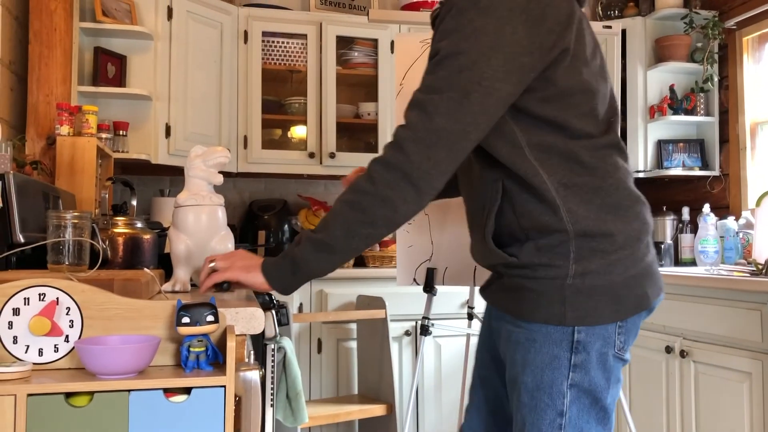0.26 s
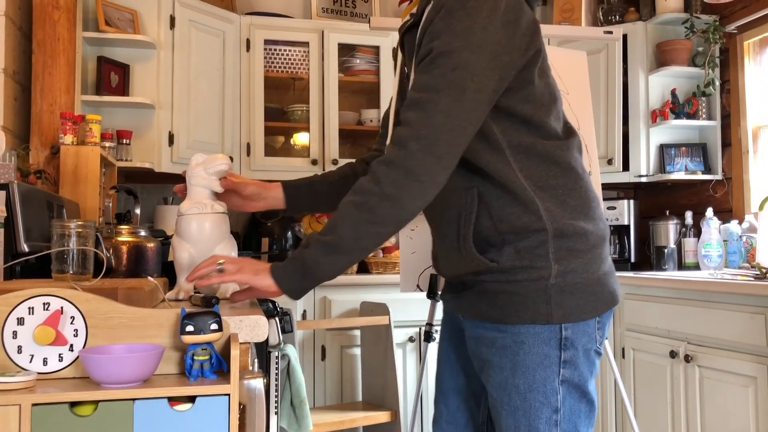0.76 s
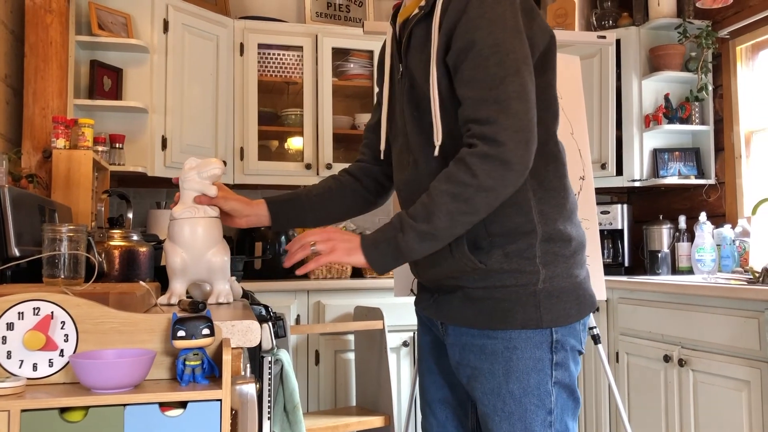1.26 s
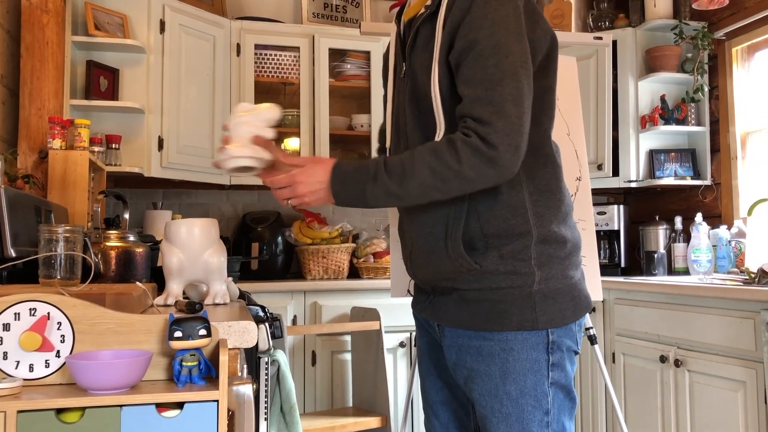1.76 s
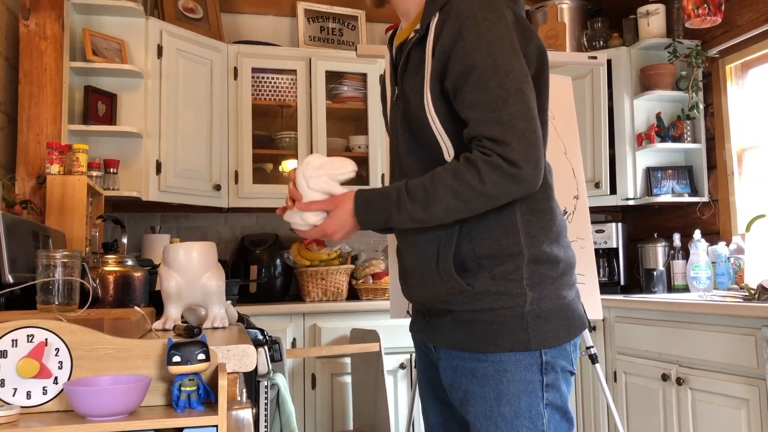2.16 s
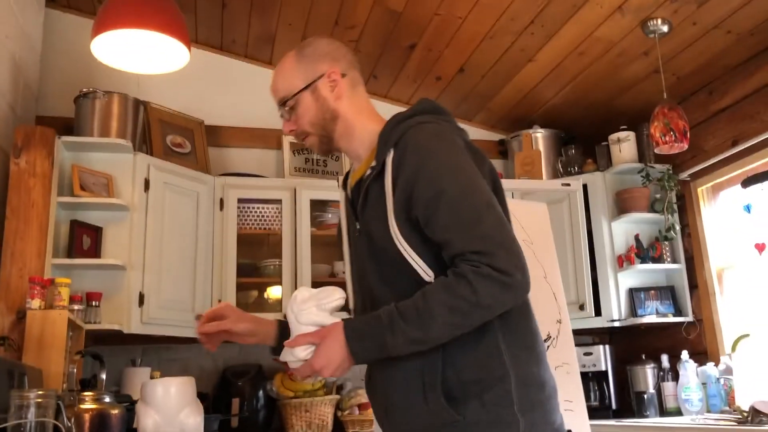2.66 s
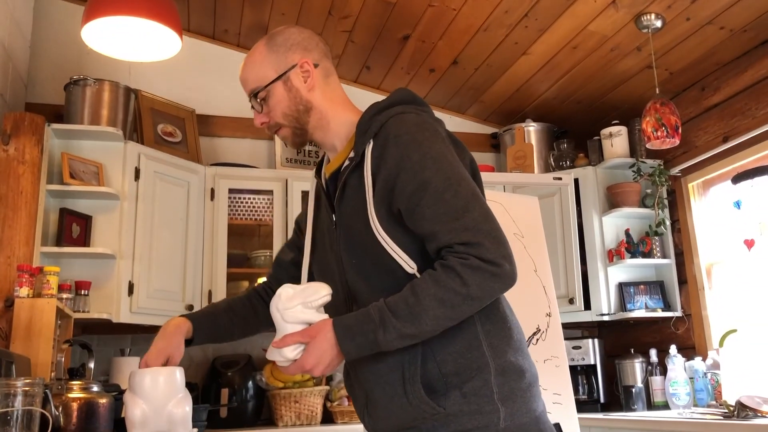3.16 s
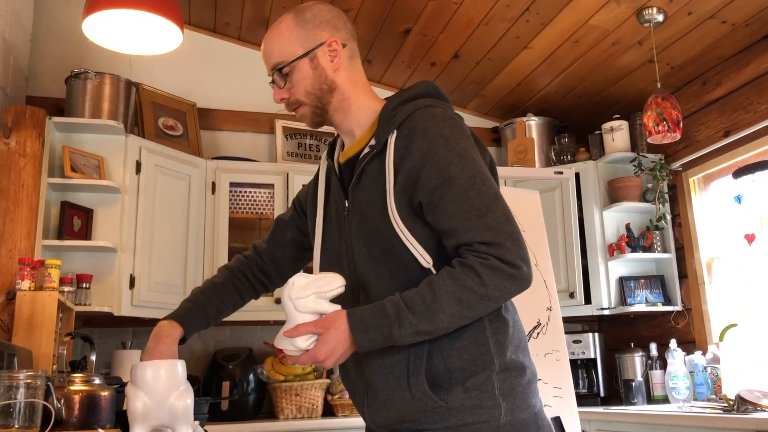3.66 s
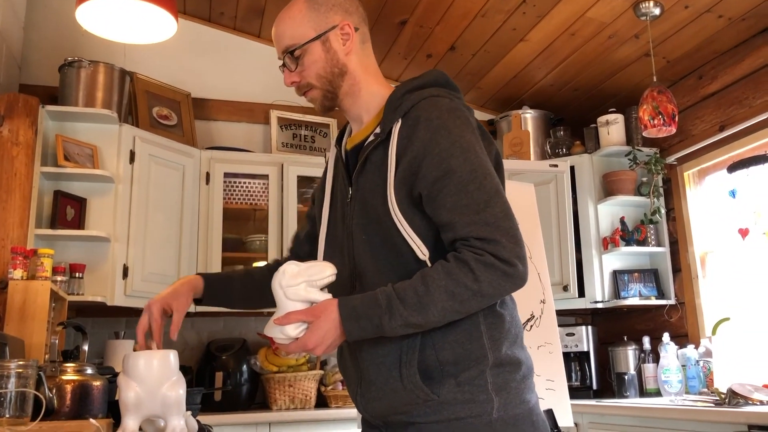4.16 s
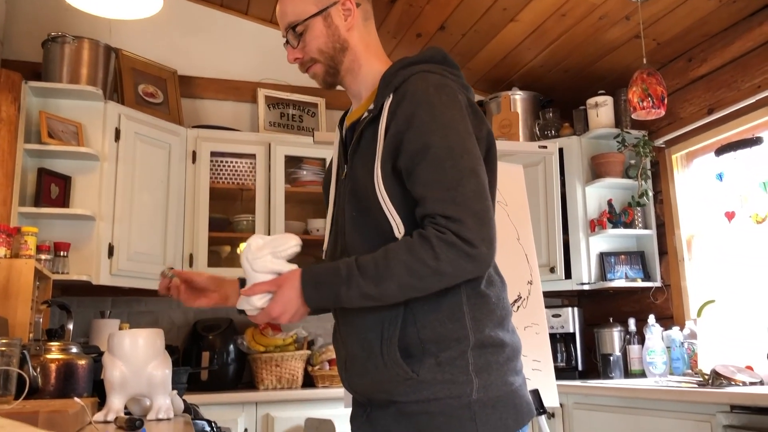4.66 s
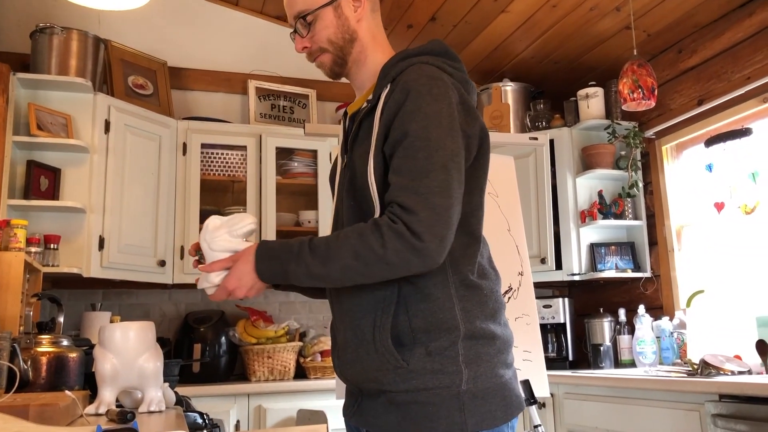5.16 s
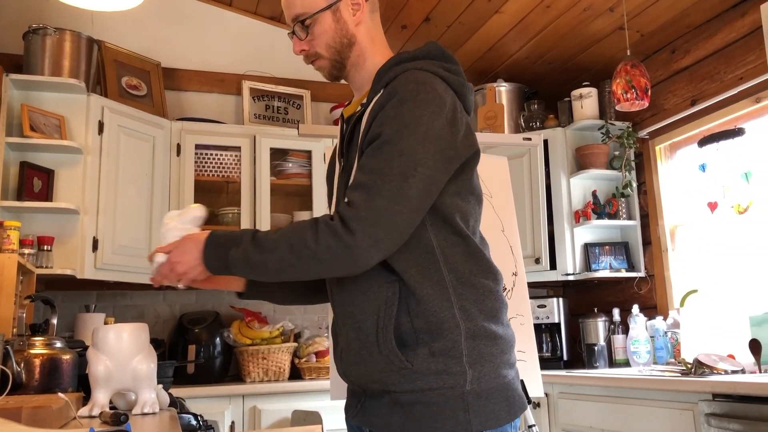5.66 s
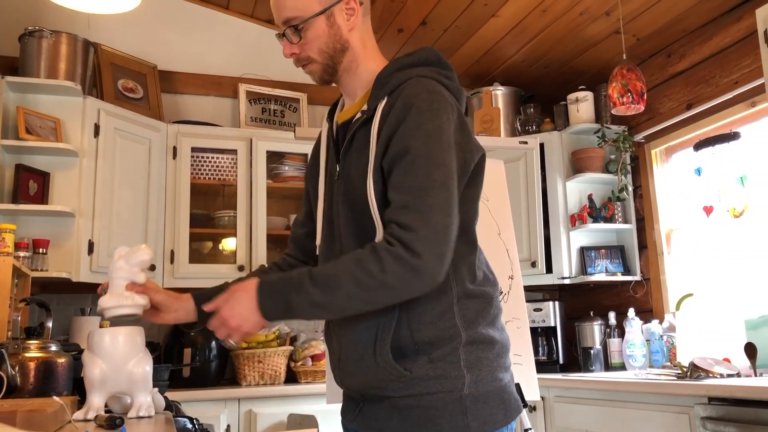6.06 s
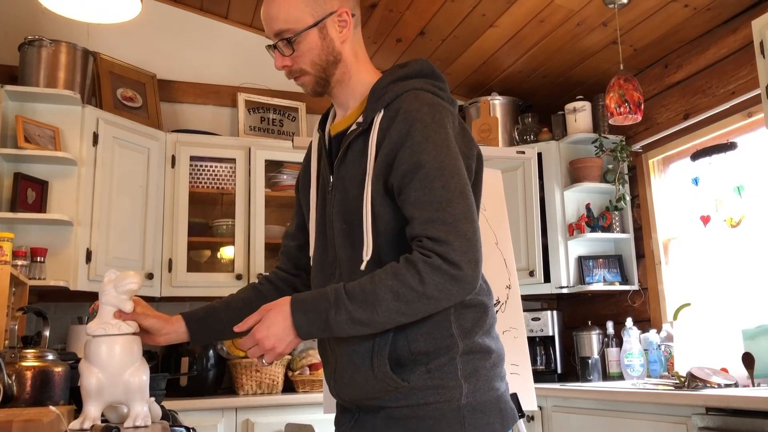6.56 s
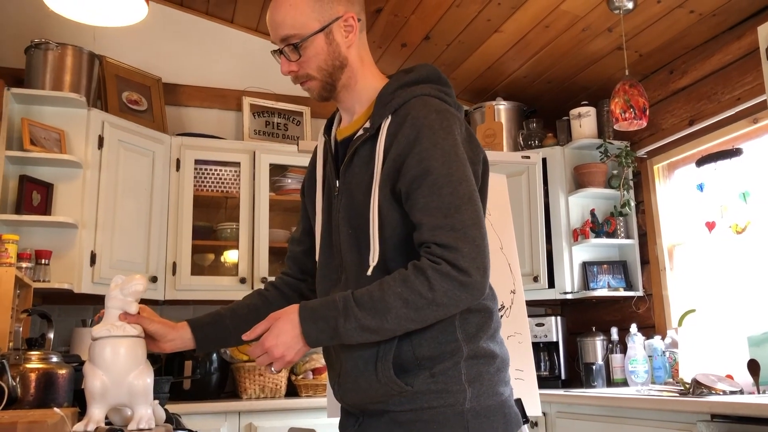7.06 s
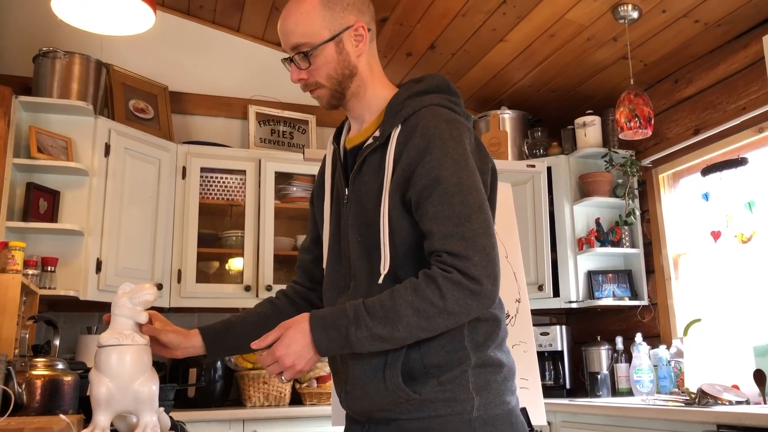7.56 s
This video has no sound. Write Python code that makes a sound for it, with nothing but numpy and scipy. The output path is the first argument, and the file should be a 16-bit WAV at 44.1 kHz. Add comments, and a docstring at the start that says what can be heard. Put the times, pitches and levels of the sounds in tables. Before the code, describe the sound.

A ceramic jar lid clinks softly as it lifts off, pings once when tapped, then is set back with bright ringing clinks in a quiet kitchen.

```python
"""The ceramic lid of a hollow jar clinks, bounces and scrapes on its rim: decaying modes ring the pottery,
damped bursts give the crack of the glaze and the knock of the wall, and low modes thud in the counter below.
Softer bumps rock the jar. Off the jar, the lid whispers under sliding fingers and pings once when tapped.
Hands pat the counter, click and squeak; a sleeve rustles as shaped noise. Echoes and a diffuse tail place this
in a quiet kitchen, over an appliance made of fan noise and faint wavering tones."""
import sys
import numpy as np
from scipy import signal
from scipy.fft import rfft, irfft
from scipy.io import wavfile

SR = 44100
rng = np.random.default_rng(int(sys.argv[2]) if len(sys.argv) > 2 else 0)


def to_wav(sig):
    """Store sig (one row per channel, or 1-D mono) as 16-bit WAV at the path in sys.argv[1].

    Samples outside -1..1 are clipped; the rate is SR.
    """
    pcm = np.clip(np.atleast_2d(sig), -1, 1) * 32767
    pcm = np.round(pcm).astype(np.int16)
    wavfile.write(sys.argv[1], SR, pcm.T)  # frames by channels


N = 344063

# Appliance air colour. Each row: frequency in Hz, relative level in dB.
AIR_COLOUR = [(12, -59), (20, -42), (49, -7), (68, 0), (86, -4), (177, 0), (270, -1), (293, -4.5),
              (377, -4), (459, -7.5), (624, -15), (2990, -27.5), (5080, -28), (7110, -33.5), (16000, -37.5)]
# Appliance hum. Each row: frequency in Hz, rms level in dB before the overall hum trim.
HUM_LINES = [(59.2, -72), (296.1, -68), (468.3, -71.5), (506.0, -74), (549.1, -75), (10008, -92.5),
             (11897, -101)]
# Cloth colour of the sleeve. Each row: frequency in Hz, relative level in dB.
SLEEVE_COLOUR = [(350, -28.5), (600, -5.5), (625, 3.5), (679, -1), (3120, -4), (3530, -4.5), (15100, -15),
                 (16000, -19.5)]
# The arm moves as the hand grips the lid. Each row: start in seconds, length in seconds, peak level in dB.
ARM_MOVES = [(.55, .8, -73)]
# The hand pats the counter. Each row: start in seconds, slap level in dB, slap centre in Hz, thud level in dB.
COUNTER_PATS = [(0.2278, -48.5, 1760, -50.5), (0.334, -86, 910, -50), (.449, -49, 1460, -51)]
# Modes of the jar and the counter under it. Each row: frequency in Hz, level in dB before the thud's
# centre is favoured, 60 dB decay time in seconds.
COUNTER_MODES = [(66.5, -15.5, 0.2), (90, -12, 0.25), (113, -19.5, 0.39), (187.5, -3.5, 0.14),
                 (223, -3.5, 0.06), (289, 1, 0.049), (336.4, -6, 0.067), (413.5, -18, 0.33),
                 (626, 2.5, 0.049), (858, -16.5, 0.27), (931, -2.5, 0.1), (970, -31, 0.054)]
# Dull bumps that rock the jar, from the hand or from the lid settling.
# Each row: start in seconds, knock level in dB, thud level in dB, thud centre in Hz.
JAR_BUMPS = [ (.713, -47, -45, 1050), (.7325, -44.5, -43.5, 1010), (0.79, -46.5, -37.5, 148),
             (0.827, -45, -37, 215), (3.2445, -43, -38, 258), (3.264, -52, -38.5, 200),
             (3.2918, -50.5, -31, 215), (3.3954, -51, -38, 226), (7.025, -47, -33.5, 150)]
# Crack colour of the glaze. Each row: frequency in Hz, level in dB before tilting.
GLAZE_COLOUR = [(500, 6.5), (1500, -2), (3000, 4), (4800, -10), (6500, -0.5), (9000, -25), (12000, -22.5),
                (16000, -17)]
# Modes of the jar with its lid on the rim. One entry per mode: frequency in Hz.
JAR_MODES_HZ = [1610, 2185, 2637, 2730, 2955, 3063, 3380, 3580, 3930, 4025, 4100, 4322, 4440, 5022, 5600,
                5845, 6030, 6155, 6690, 7195, 7767, 8160, 8537, 8930, 9450, 10200, 10800, 11720, 12460,
                13595]
# The same modes, one entry each: level in dB before touch and spot reshape them.
JAR_MODES_DB = [-2.5, -4, 4, 1.5, -10.5, -50.5, -21, -1, -1.5, -7, -1, -5.5, -6.5, -3, -4.5, -11.5, -9, -3,
                -17.5, -8, -5, -36.5, -13.5, -16, -13, -14, -14.5, -15.5, -16.5, -27.5]
# The lid strikes the rim. Each row: start in seconds, ring level in dB, knock level in dB, thud level in dB,
# tilt in dB per octave, pitch in Hz that this spot on the rim favours, boost at that pitch in dB.
LID_CLINKS = [ (0.7314, -49.5, -47, -39, -0.5, 4400, 10), (1.286, -52, -49, -44.5, -1, 2620, 12),
              (1.353, -33.5, -43.5, -33.5, .5, 5600, 6), (1.424, -49, -59, -64, -9, 2600, 26),
              (6.257, -32.5, -26.5, -24, 2, 4220, 18), (6.6276, -30.5, -52, -33, 1, 2640, 15),
              (6.635, -30, -52, -40, -1, 2600, 22), (6.846, -51.5, -44.5, -41.5, -1.5, 3500, 5),
              (6.9824, -27.5, -42, -40, 0.5, 2730, 6.5), (6.995, -17.5, -29, -38.5, 2, 3500, 9.5),
              (7.001, -27, -43.5, -34.5, 4.5, 3380, 10), (7.016, -22, -30, -36.5, 1.5, 2950, 24),
              (7.321, -31.5, -32, -29, 0, 4050, 16), (7.392, -53, -55, -48, 1, 5600, 17),
              (7.4667, -56, -41.5, -45.5, -21, 5000, 28)]
# The lid scrapes along the rim, swelling and fading.
# Each row: start in seconds, length in seconds, peak level in dB.
RIM_SCRAPES = [(1.30, 0.083, -49.5), (6.57, 0.022, -57.5), (6.655, 0.06, -49), (6.79, 0.095, -55.5),
               (6.87, .11, -68)]
# Modes of the lid held free. One entry per mode: frequency in Hz.
LID_MODES_HZ = [447, 2503, 3830, 4018, 4115, 4308, 4366, 5850, 6024, 6262, 7202, 7410, 7580, 8809, 9514,
                10560, 11500, 12830, 14800, 15500]
# The same modes, one entry each: relative level in dB.
LID_MODES_DB = [-24.5, -37.5, -16.5, 4.5, -9.5, -6, -8, 0.5, -2.5, -10, 2, -14, -6, -17.5, -6, -28, -21,
                -19, -18.5, -17.5]
# Fingers slide over the free lid. Each row: start in seconds, length in seconds, peak level in dB.
LID_SLIDES = [(1.869, 0.11, -71.5), (1.978, 0.14, -72.5)]
# A hard tap on the free lid. Each row: start in seconds, ring level in dB.
LID_TAPS = [(2.0761, -19)]
# Small clicks in the fingers. Each row: start in seconds, level in dB.
FINGER_CLICKS = [(4.485, -68), (4.53, -67), (5.353, -45.5), (5.531, -48.5), (5.535, -57), (5.599, -59.5),
                 (5.893, -63), (6.009, -61.5), (6.235, -61.5)]
# Click colour. Each row: frequency in Hz, relative level in dB.
CLICK_COLOUR = [(500, -29), (1500, -6.5), (2800, -3), (5000, -1), (9000, -0.5), (13000, -2), (16000, 2)]
# A tiny high squeak. Each row: start in seconds, level in dB, frequency in Hz, 60 dB decay time in seconds.
FINGER_SQUEAKS = [(5.806, -53, 14200, 0.033)]
# Quick echoes between counter, wall and cupboards. Each row: delay in seconds, strength from 0 to 1.
ECHO_PATHS = [(.0019, .76), (.0034, .74)]
# Kitchen reverberation. Each row: frequency in Hz, 60 dB decay time in seconds.
KITCHEN_DECAY = [(100, .5), (400, .41), (1000, .4), (3000, .39), (7000, .35), (10000, .28), (15000, .22)]

AGE = np.arange(SR // 2) / SR  # seconds since a blow
AIR_DB, HUM_TRIM_DB = -60.92, -1
# The rustle dies away as the arm comes to rest.
RUSTLE_START_DB, RUSTLE_FADE_DB_PER_S = -60.5, 16
# The palm brushes the counter with each pat: dB relative to the slap.
BRUSH_DB, BRUSH_T60_S = -8.5, .07
RIM_THUD_HZ, THUD_LAG_S = 324, 0.00316
# A bump has a low knock and a dull trace of crack: dB relative to the knock, tilt in dB per octave.
BUMP_HZ, BUMP_CRACK_DB, BUMP_TILT = 760, -8.5, -7.5
# How narrowly a spot on the rim picks its modes.
SPOT_OCTAVES = 0.032
# A clink at the usual ring level has this crack; in weaker clinks the crack shrinks more slowly (dB per dB).
USUAL_RING_DB, CRACK_DB, CRACK_GROWTH = -27.5, -35, 0.89
# The more a clink rings rather than thuds, the higher the wall knocks; the base pitch is for equal levels.
KNOCK_BASE_HZ, HARDNESS_DB_PER_OCTAVE = 1017, 19.5
# One bounce after every clink: dB relative to the clink, extra tilt in dB per octave.
BOUNCE_S, BOUNCE_DB, BOUNCE_TILT = 0.026, -15.5, 0.7
SLIPS_PER_S, SLIP_SPREAD_DB = 700, 4.5
EDGE_HZ = 16100  # top of the sound band


def amp(db):
    """Converts decibels to gain."""
    return 10 ** (np.asarray(db) / 20)


def read(points, hz):
    """Joins a table's points by straight lines over log frequency."""
    f, value = np.transpose(points)
    return np.interp(np.log(hz + 1), np.log(f), value)


def unit(x):
    """Scales a blow to the energy of 10 ms at full level."""
    return x / np.sqrt(np.sum(x ** 2) / (SR / 100) + 1e-20)


def add(mix, start_s, sound):
    """Mixes a sound in at its start time."""
    part = mix[round(start_s * SR):][:len(sound)]
    part += sound[:len(part)]


def swells(rows):
    """Draws a gain curve with one smooth arch for each start, length and level."""
    gain = np.zeros(N)
    for start_s, length_s, db in rows:
        arch = np.sin(np.pi * np.arange(0, length_s, 1 / SR) / length_s)
        add(gain, start_s, amp(db) * arch)
    return gain


def noise(colour):
    """Shapes white noise into a steady colour at rms 1."""
    spectrum = rfft(rng.standard_normal(N))
    x = irfft(spectrum * amp(read(colour, np.fft.rfftfreq(N, 1 / SR))), N)
    return x / x.std()


def ring(modes):
    """Starts a set of exponentially dying sines with one blow, each with a random sign."""
    hz, db, t60 = np.transpose(modes)[:, :, None]
    sign = rng.choice([-1, 1], hz.shape)
    decay = amp(db - 60 * AGE / t60)
    return unit((sign * decay * np.sin(2 * np.pi * hz * AGE)).sum(0))


def ring_time(hz, t60, slope):
    """Internal losses shorten the ring at higher pitches; t60 is the decay time at 4 kHz."""
    return t60 * (np.array(hz) / 4000) ** -slope


def burst(colour, t60, snap=0.65):
    """A sharp first touch and a thicket of heavily damped modes, as decaying noise through a causal filter."""
    log_gain = np.log(amp(read(colour, abs(np.fft.fftfreq(2048, 1 / SR)))))
    # The phase that goes with this colour puts the filter's response after the blow.
    taps = np.fft.ifft(np.exp(np.conj(signal.hilbert(log_gain)))).real
    puff = rng.choice([-1, 1], len(AGE)) * amp(-60 * AGE / t60)
    puff[0] = snap * np.linalg.norm(puff)
    return unit(signal.fftconvolve(puff, taps)[:len(AGE)])


def appliance(waver=0.3):
    """Fan noise with faint tones whose phases wander at random."""
    t = np.arange(N) / SR
    knots = np.arange(0, N / SR + 1, .25)  # a new phase step every quarter second
    hum = np.zeros(N)
    for hz, db in HUM_LINES:
        drift = np.interp(t, knots, np.cumsum(rng.standard_normal(len(knots))))
        hum += amp(db) * np.sqrt(2) * np.sin(2 * np.pi * hz * t + waver * drift)
    return amp(AIR_DB) * noise(AIR_COLOUR) + amp(HUM_TRIM_DB) * hum


def sleeve():
    """Cloth friction rustles less as the arm settles, swells with the grip and brushes at each pat."""
    settling = amp(RUSTLE_START_DB - RUSTLE_FADE_DB_PER_S * np.arange(N) / SR)
    motion = settling + swells(ARM_MOVES)
    for start_s, slap_db, _, _ in COUNTER_PATS:
        add(motion, start_s, amp(slap_db + BRUSH_DB) * amp(-60 * AGE / BRUSH_T60_S))
    return noise(SLEEVE_COLOUR) * motion


def knock(hz, t60):
    """A dull blow: the shorter the contact, the higher its spectral centre."""
    colour = [(hz / 8, -32), (hz / 2.23, -7), (hz, 0), (hz * 1.72, -9), (hz * 3.17, -26), (hz * 12, -46)]
    return burst(colour, t60)


def thud(centre_hz, slope_db=9):
    """Low modes ring most near the centre set by the push of the hand, falling off in dB per octave."""
    hz, db, t60 = np.transpose(COUNTER_MODES)
    pushed_db = db - slope_db * abs(np.log2(hz / centre_hz))
    return ring(np.transpose([hz, pushed_db, t60]))


def pats():
    """A hand on the counter gives a damped slap and sets off the low modes."""
    out = np.zeros(N)
    for start_s, slap_db, slap_hz, thud_db in COUNTER_PATS:
        slap = amp(slap_db) * knock(slap_hz, t60=0.025)
        add(out, start_s, slap + amp(thud_db) * thud(centre_hz=302))
    return out


def crack(tilt, pivot_hz=3500):
    """The glaze cracks as a short burst, tilted in dB per octave."""
    colour = [(f, level + tilt * np.log2(f / pivot_hz)) for f, level in GLAZE_COLOUR]
    return burst(colour, t60=0.054, snap=0.52)


def bumps():
    """Soft contact rocks the jar: a knock with a dull crack, then a thud, without the pottery ringing."""
    out = np.zeros(N)
    for start_s, knock_db, thud_db, thud_hz in JAR_BUMPS:
        blow = knock(BUMP_HZ, t60=0.018) + amp(BUMP_CRACK_DB) * crack(BUMP_TILT)
        add(out, start_s, amp(knock_db) * blow)
        add(out, start_s + THUD_LAG_S, amp(thud_db) * thud(thud_hz, slope_db=8))
    return out


def pottery(tilt, spot_hz, spot_db):
    """The jar's modes, tilted by the hardness of the touch and favoured near the spot's pitch."""
    octaves = np.log2(np.array(JAR_MODES_HZ) / spot_hz)
    favoured = spot_db * np.exp(-.5 * (octaves / SPOT_OCTAVES) ** 2)
    t60 = ring_time(JAR_MODES_HZ, .105, .2)
    return ring(np.transpose([JAR_MODES_HZ, JAR_MODES_DB + tilt * octaves + favoured, t60]))


def clink(ring_db, knock_db, thud_db, tilt, spot_hz, spot_db):
    """Lid on rim rings the pottery, cracks the glaze, knocks the wall, then shakes the counter."""
    knock_hz = KNOCK_BASE_HZ * 2 ** ((ring_db - thud_db) / HARDNESS_DB_PER_OCTAVE)
    crack_db = CRACK_DB + CRACK_GROWTH * (ring_db - USUAL_RING_DB)
    out = amp(ring_db) * pottery(tilt, spot_hz, spot_db)
    out += amp(knock_db) * knock(knock_hz, t60=0.033)
    out += amp(crack_db) * crack(tilt)
    add(out, THUD_LAG_S, amp(thud_db) * thud(RIM_THUD_HZ))
    return out


def clinks():
    """Each strike on the rim is followed by one lighter, brighter bounce that favours its spot less."""
    out = np.zeros(N)
    for start_s, ring_db, knock_db, thud_db, tilt, spot_hz, spot_db in LID_CLINKS:
        add(out, start_s, clink(ring_db, knock_db, thud_db, tilt, spot_hz, spot_db))
        bounce = clink(ring_db, knock_db, thud_db, tilt + BOUNCE_TILT, spot_hz, spot_db / 2)
        add(out, start_s + BOUNCE_S, amp(BOUNCE_DB) * bounce)
    return out


def scrapes(grit_db=-2):
    """Tiny random slips of glaze on glaze keep the pottery ringing while the lid slides on the rim."""
    happens = rng.random(N) < SLIPS_PER_S / SR
    sizes = rng.choice([-1, 1], N) * amp(SLIP_SPREAD_DB * rng.standard_normal(N))
    slips = happens * sizes
    rubbing = slips / slips.std() * swells(RIM_SCRAPES)
    body = pottery(tilt=-0.69, spot_hz=2646, spot_db=3) + amp(grit_db) * crack(tilt=-1)
    return signal.fftconvolve(rubbing, body / np.linalg.norm(body))[:N]


def free_lid(tick_db=-10):
    """Off the jar the lid rings higher and cleaner: faintly under sliding fingers, brightly when tapped."""
    t60 = ring_time(LID_MODES_HZ, 0.057, .6)
    tone = ring(np.transpose([LID_MODES_HZ, LID_MODES_DB, t60]))
    tick_colour = [(500, -24.5), (2000, -17), (4000, -1.0), (7500, -2.5), (11000, -10.5), (16000, -5.5)]
    tick = burst(tick_colour, t60=0.031, snap=.5)
    rubbed = signal.fftconvolve(rng.standard_normal(N), tone)[:N]
    out = rubbed / rubbed.std() * swells(LID_SLIDES)
    for start_s, db in LID_TAPS:
        add(out, start_s, amp(db) * (tone + amp(tick_db) * tick))
    return out


def fingers():
    """Small contacts in the fingers click as very short bursts; a squeak is one dying high sine."""
    out = np.zeros(N)
    for start_s, db in FINGER_CLICKS:
        add(out, start_s, amp(db) * burst(CLICK_COLOUR, t60=0.0059, snap=1.0))
    for start_s, db, hz, t60 in FINGER_SQUEAKS:
        add(out, start_s, amp(db) * ring([(hz, 0, t60)]))
    return out


def kitchen(x, tail_db=-4.5, build_s=0.0045):
    """Quick repeated echoes smear each blow without colouring it; a diffuse tail builds up and decays."""
    hz, early = np.fft.rfftfreq(len(AGE), 1 / SR), 1
    for delay_s, strength in ECHO_PATHS:
        delay = np.exp(-2j * np.pi * hz * round(delay_s * SR) / SR)
        early = early * (strength + delay) / (1 + strength * delay)  # all-pass echo
    # Sparse reflections, about 4000 per second, die at their own rate in each band.
    reflections = rng.choice([-1., 1.], len(AGE)) * (rng.random(len(AGE)) < 4000 / SR)
    band_hz, t, bands = signal.stft(reflections, SR, nperseg=256)
    decay = amp(-60 * t / read(KITCHEN_DECAY, band_hz)[:, None])
    tail = signal.istft(bands * decay, SR)[1][:len(AGE)]
    tail *= 1 - np.exp(-AGE / build_s)
    response = irfft(early, len(AGE)) + amp(tail_db) * tail / np.linalg.norm(tail)
    return signal.fftconvolve(x, response / np.linalg.norm(response))[:N]


def scene(bass_hz=52):
    """Everything as it reaches one microphone; small objects radiate little deep bass."""
    handling = sleeve() + pats() + bumps() + clinks() + scrapes() + free_lid() + fingers()
    bass_cut = signal.butter(4, bass_hz, "highpass", fs=SR, output="sos")
    return (kitchen(signal.sosfilt(bass_cut, handling)) + appliance())[None]


def record(dry):
    """Limits the band with a steep low-pass."""
    low_pass = signal.firwin(511, EDGE_HZ, window=("kaiser", 9), fs=SR)
    return signal.oaconvolve(dry, low_pass[None], "same")


dry = scene()
out = record(dry)
to_wav(out)
```